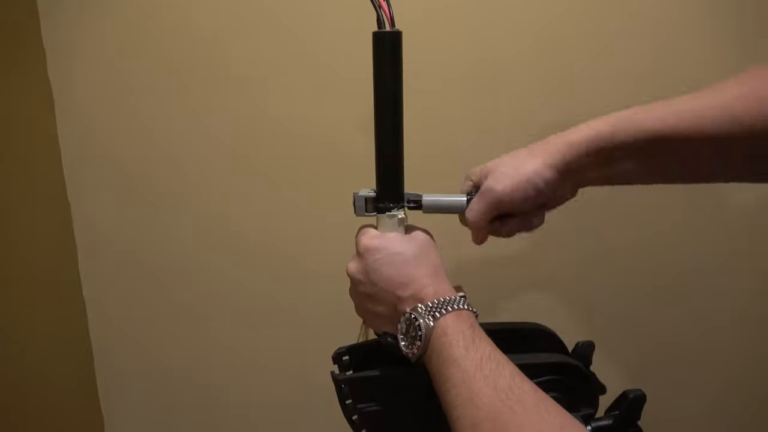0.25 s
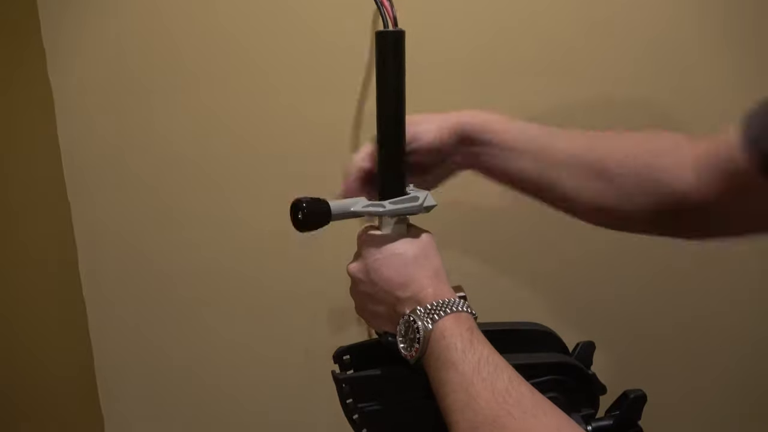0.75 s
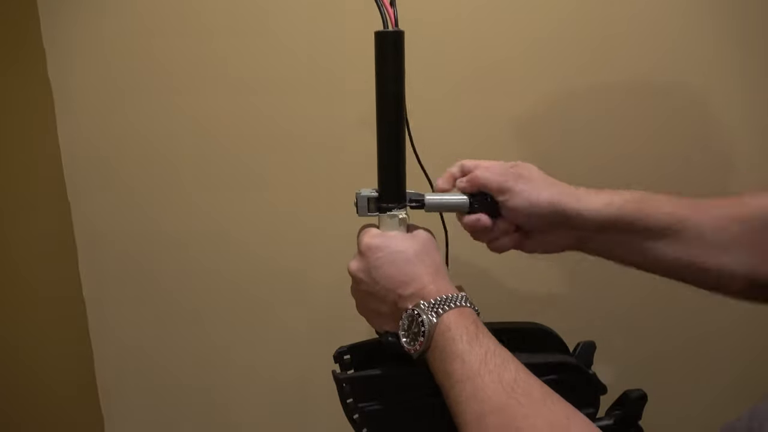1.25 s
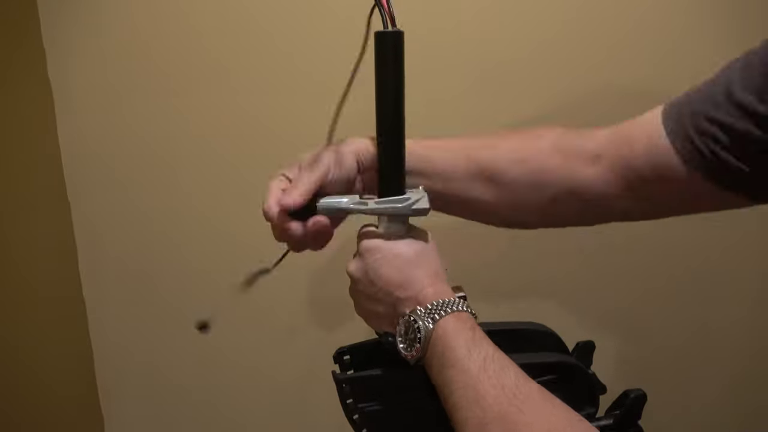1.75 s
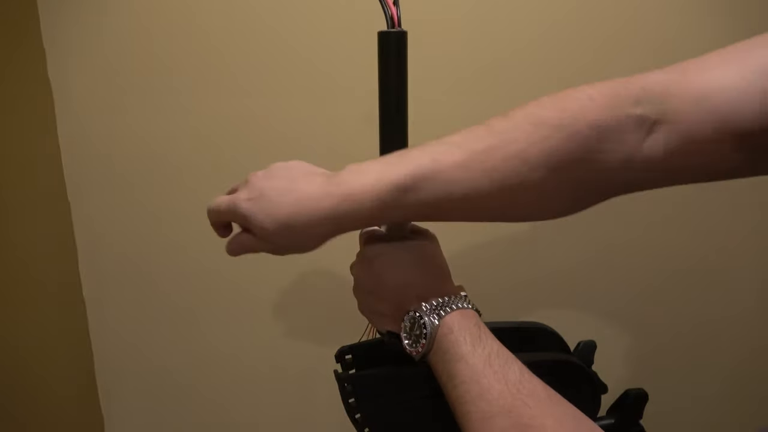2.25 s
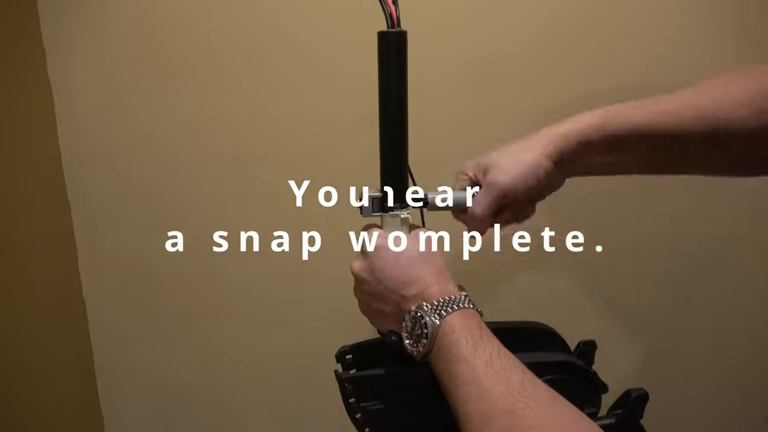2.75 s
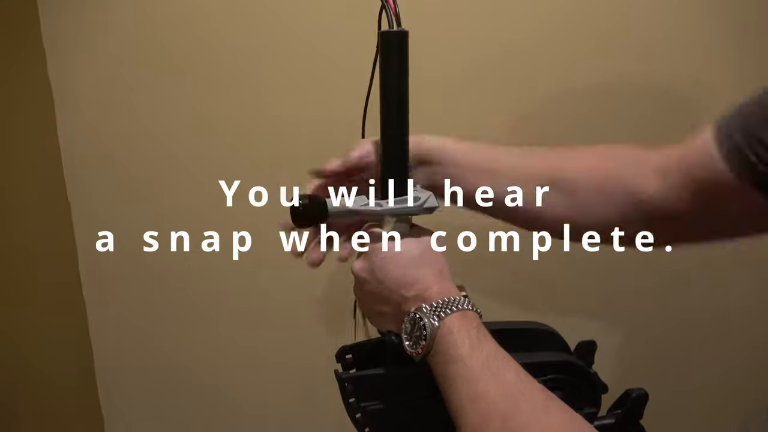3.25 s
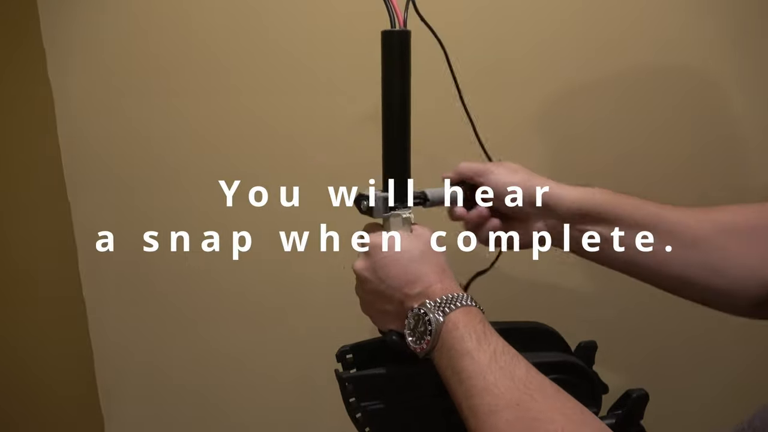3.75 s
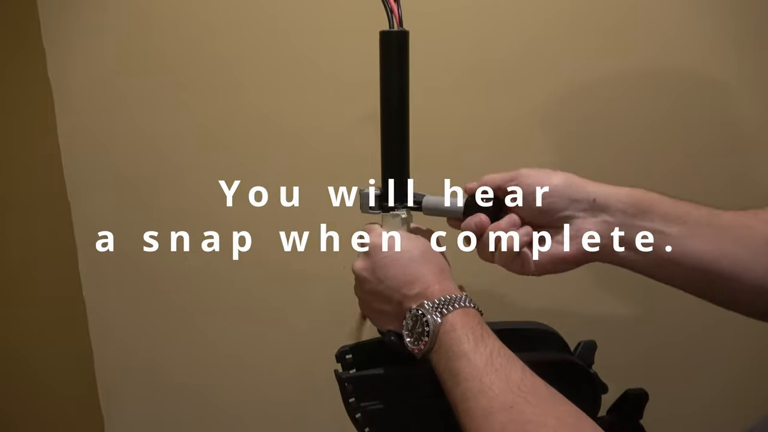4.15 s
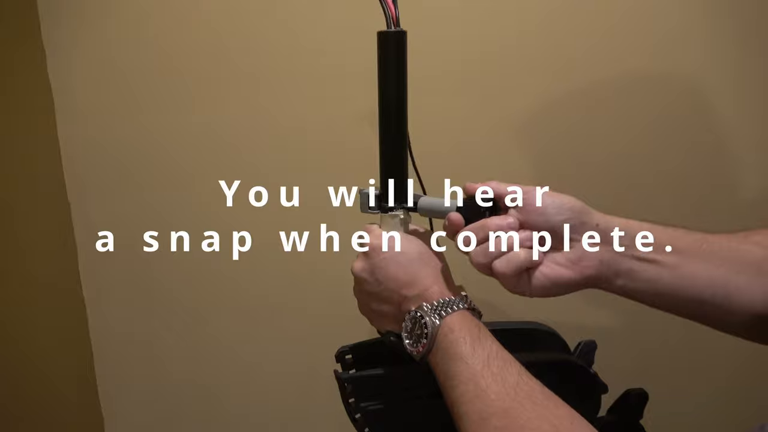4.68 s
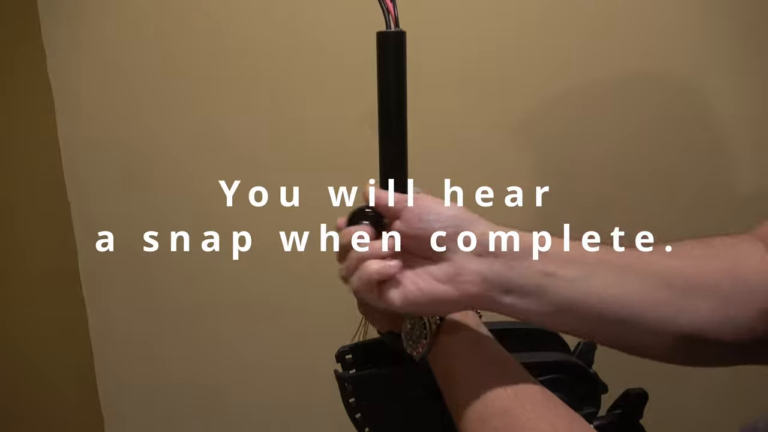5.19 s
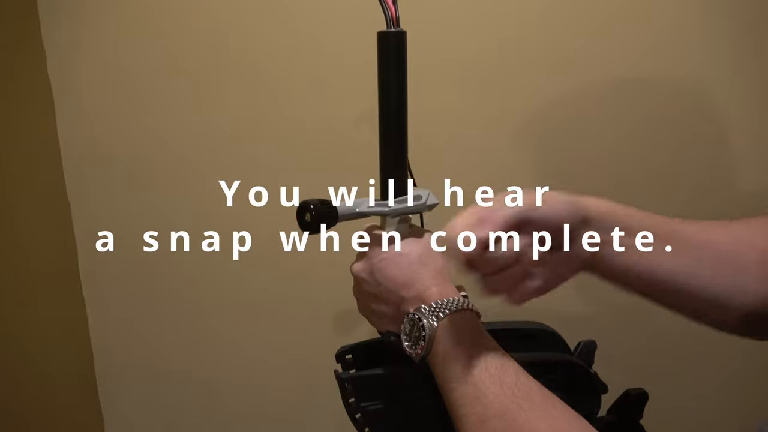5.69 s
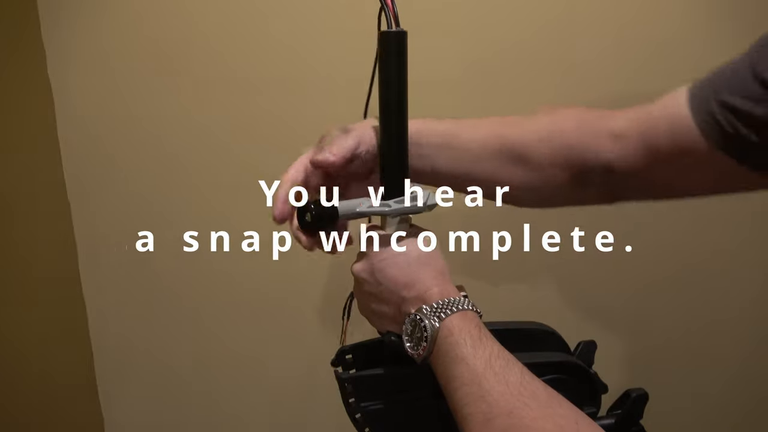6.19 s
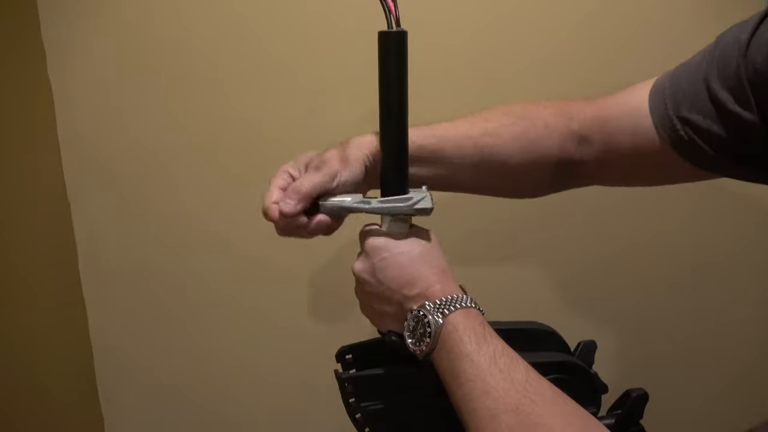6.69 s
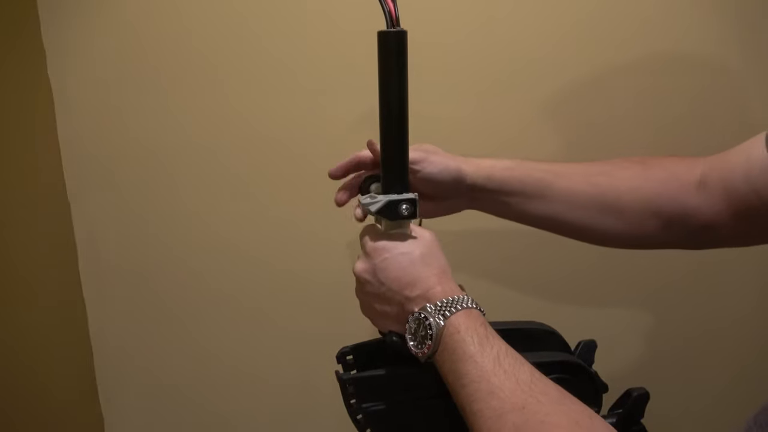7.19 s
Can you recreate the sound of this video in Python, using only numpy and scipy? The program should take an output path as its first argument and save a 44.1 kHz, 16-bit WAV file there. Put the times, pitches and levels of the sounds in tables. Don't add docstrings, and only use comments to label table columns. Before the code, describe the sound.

A phone sits close to a pipe cutter turning on a metal tube in a bare room. From 0 to 3.5 s the turns are sped up: gritty metal rubbing surges and pauses, with soft-edged, blurred knocks and rattles in a short, wide, unnatural echo. It starts quiet, grows busier after 1.1 s, and peaks with heavy clunks and low stand thumps at about 1.9, 2.2 and 2.6 s, then eases. From 3.5 s speed is natural: crisp clicks and hard, bright ringing clacks cluster at 3.6-3.95 s. Quieter rubbing and faint hiss follow, with a sharp tick at 4.8, small clicks around 5.05-5.4, and soft hollow thunks at 5.6 and 6.2. A rough singing rub rises from 6.6 s into a piercing snap at 6.77, by far the loudest event. Bright metallic chatter rings, dulls and fades, with a small settling rattle at 7.33.

```python
import sys
import numpy as np
from scipy import signal
from scipy.fft import rfft, irfft, next_fast_len
from scipy.io import wavfile
from scipy.ndimage import uniform_filter1d

SR = 44100
rng = np.random.default_rng(int(sys.argv[2]) if len(sys.argv) > 2 else 0)


def pcm_store(signal):
    levels = np.round(np.clip(np.atleast_2d(signal), -1, 1) * 32767)
    wavfile.write(sys.argv[1], SR, levels.astype(np.int16).T)


def magnitude_from_level(level_db):
    exponent = np.asarray(level_db, float) / 20
    return 10 ** exponent


N = 327652
NATURAL_S = 3.46
STAND_LIKE = 0.1
THUMP_RISE_MS = 6

# pitch in Hz, level in dB, ring time (t60) in s.
TUBE_MODES = [(694, 7.5, 0.065), (910, -57.5, 0.034), (1130, -5.5, 0.2), (1575, -4.5, 0.12),
              (1950, 16.5, 0.012), (2290, 13.5, 0.0078), (2500, 15, 0.013)]
TOOL_MODES = [(2676, 4, 0.025), (3260, 15, 0.0079), (3800, 14.5, 0.0063), (4080, -4.5, .05),
              (4400, -5, 0.055), (4670, 6, 0.0075), (4860, -13, 0.032)]
WHEEL_MODES = [(6810, -10, 0.008), (7570, -23, 0.0085), (8000, -10, 0.0042), (9210, 6, 0.0017),
               (13200, -25, 0.0045)]
# lowest Hz, highest Hz, share of broad click in dB, length of push in ms,
# blow level in dB, left-right likeness of the rubbing (0-1).
PART_SETTINGS = [
    (1042, 3200, 4, 1, 9, 0.73),
    (2500, 5330, 2, 0.81, 9, 0.73),
    (5240, 14260, 6, 0.45, 9, 0.7),
]
# start in seconds, peak in dB,
# pitch in Hz.
THUMPS = [(0.038, -74, 225), (0.537, -47.5, 136), (0.09, -63, 150), (1.354, -53, 215),
          (1.511, -40, 215), (1.88, -46.5, 145), (2.029, -47.5, 160.4), (2.175, -25, 519),
          (2.185, -29, 161), (2.238, -33.5, 536), (2.25, -37, 166), (2.577, -50, 160),
          (3.49, -51, 146), (3.717, -49, 161), (3.779, -48, 215), (3.894, -46.5, 162),
          (3.943, -48, 165), (4.823, -54.5, 295), (5.065, -48.5, 496), (5.26, -41.5, 330),
          (6.768, -67, 556), (6.842, -53, 146), (7.111, -49, 151), (7.247, -54, 110),
          (0.19, -48.5, 673), (0.265, -57.5, 497), (1.52, -50, 538), (5.578, -45.5, 633),
          (6.227, -49, 613), (5.1, -58, 169), (3.9, -37.5, 669), (3.948, -38, 702), (6.77, -32.5, 693),
          (3.64, -51, 690)]
# time in seconds, effort in dB, brightness in dB.
TUBE_SHUDDER = [
    (6.766, -80, -5.5),
    (6.771, -34, -2),
    (6.79, -31, 3.5),
    (6.89, -36, 2),
    (6.95, -40, -9),
    (7.01, -45, -16),
    (7.084, -51, -24),
    (7.3, -58, 4.5),
    (7.43, -68.5, 18),
]


def unit(x):
    return x / np.sqrt(np.mean(x ** 2) + 1e-30)


def band(x, lo_hz, hi_hz):
    sos = signal.butter(3, [lo_hz, min(hi_hz, 20000)], "band", fs=SR, output="sos")
    return signal.sosfilt(sos, x)


def pair(size, like):
    mid, side = rng.standard_normal((2, size))
    like = np.clip(like, 0, 1)
    return np.sqrt(1 + like) * mid + np.sqrt(1 - like) * side * np.array([[1], [-1]])


def through(x, response):
    return signal.fftconvolve(x, np.atleast_2d(response), axes=1)[:, :N]


def coloured(x, hz, db):
    size = next_fast_len(N)
    log_hz = np.log(np.fft.rfftfreq(size, 1 / SR) + 1)
    gain = magnitude_from_level(np.interp(log_hz, np.log(hz), db))
    return irfft(rfft(x, size) * gain, size)[..., :N]


def body(modes, lo_hz, hi_hz, broad_db, hurry):
    t = np.arange(SR // 4) / SR
    ring = sum(magnitude_from_level(db) * np.sin(2 * np.pi * hz * t) * 1000 ** (-t * hurry / t60) for hz, db, t60 in modes)
    click = band(1. * (t == 0), lo_hz, hi_hz)
    both = band(unit(ring), lo_hz * 0.9, hi_hz * 1.14) + magnitude_from_level(broad_db) * unit(click)
    return unit(both) / np.sqrt(len(t))


def tones(s, db, hz, rise_ms, t60, like, spread):
    t = np.arange(int(SR * min(t60 + .01, .3))) / SR
    swell = (1 - np.exp(-(t * 1000 / rise_ms) ** 2)) * 1000 ** (-t / t60)
    out = np.zeros((2, N + 2 * len(t)))
    chances = rng.random((len(s), 5, 4, 1))
    for at, gain, f, chance in zip((s * SR).astype(int), magnitude_from_level(db), hz, chances):
        for rank, (detune, start, *sides) in enumerate(chance):
            pitch = f * (1 + spread * min(rank, 1) * (2 * detune - 1))
            phase = 2 * np.pi * (pitch * t + start + (1 - like) * np.array(sides))
            out[:, at:at + len(t)] += gain * 0.54 ** rank * swell * np.sin(phase)
    return out[:, :N]


def pushes(table, column, shape, like, kick):
    out = np.zeros((2, N + 2 * len(shape)))
    for row in table:
        at = int(row[0] * SR)
        gain = magnitude_from_level(row[1] + row[column])
        out[:, at:at + len(shape)] += gain * (kick + shape * pair(len(shape), like))
    return out[:, :N]


def effort(answer):
    # start of most effort in seconds, effort in dB, brightness in dB, rise in s, fall in s.
    fast_strokes = [(0.0, -48, -7, .1, 0.25), (0.2, -54, -9, 0.083, 0.06), (0.336, -54.5, 9.5, 0.12, -0.3),
                    (0.48, -58, 0, 0.023, 0.13), (0.562, -55, -14, 0.12, 0.1),
                    (0.67, -57, -0.5, 0.54, -0.67), (0.97, -52, -3, 0.052, -0.06),
                    (1.1, -45.5, -8, 0.13, -0.02), (1.2, -49.5, -10, 0.087, 0.05),
                    (2.535, -47, -12, .04, .1), (2.62, -49, -17, 0.071, 0.06),
                    (2.82, -50.5, -4, 0.035, .05), (2.33, -48, -13, .03, 0.05), (1.52, -47, -15, 0.077, 0),
                    (1.609, -52, -1.5, 0.74, 0.12), (1.958, -43.5, -9.5, 0.2, 0.08),
                    (2.14, -52.5, -4, 0.42, -10), (2.209, -36.5, -8.5, 0.086, 0.1347),
                    (2.35, -63.5, 8.5, 0.17, 0.4), (2.629, -50, 1.5, 0.26, 0.11),
                    (2.88, -54.5, -15, 0.13, 0.37), (3.141, -54, -1, 0.8, 0.17), (3.22, -73, 7, 0.25, 4)]
    natural_strokes = [(3.51, -51, 4, 0.13, 0.055), (3.65, -44, -15, 0.23, 0.31), (3.8, -74, -3, .3, .2),
                       (3.89, -44.5, 1, 0.044, 0.19), (3.98, -54, -6, 0.36, 0.042),
                       (4.211, -56, -0.5, 0.16, 0.38), (4.45, -65.5, 17, 0.33, 0.21),
                       (4.81, -63, 6, 0.42, 0.21), (5.02, -54, -24, 0.35, 0.27),
                       (5.2, -57, 0.5, 0.32, 0.44), (5.32, -54.5, -3, 0.63, 0.34),
                       (5.6, -57.5, -0.5, 0.97, 0.37), (5.83, -63.5, 1, 0.86, 0.11),
                       (6.118, -74, 30, .015, 0.13), (6.165, -82, 24, 0.1, 0.043),
                       (6.22, -65, 3, 0.1, 0.016), (6.24, -53.5, -14, .015, 0.22),
                       (6.287, -67, 10, 0.089, 0.17), (6.614, -68.5, 14.5, 0.068, 0.22),
                       (6.676, -56.5, 5.5, 0.094, 0.32), (6.752, -57, 3.5, 0.088, 0.014),
                       (6.775, -45, 17, .008, .15), (7.115, -44, -13, .04, 0.096)]
    # dB at usual effort, dB per dB of effort, dB per dB of brightness, dB at rest.
    answers = [
        (-71, 0.7552, 0.28, -97),
        (-55.5, 1, 0, -96),
        (-57.5, 1.2, 0.7447, -92),
        (-55.5, 1, 1, -69),
    ]
    usual_effort_db = -55
    stroke_db = 20
    t = np.arange(0, N + 128, 128) / SR
    usual_db, slope, tilt, rest_db = answers[answer]
    s, db, bright, rise, fall = np.transpose([*fast_strokes, *natural_strokes])[:, :, None]
    before, after = (s - t) / np.maximum(rise, 1e-3), (t - s) / np.maximum(fall, 1e-3)
    db = db - stroke_db * np.where(t < s, before, after)
    strokes = magnitude_from_level(slope * (db - usual_effort_db) + tilt * bright)
    at, shake_db, shake_bright = np.transpose(TUBE_SHUDDER)
    shake = slope * (np.interp(t, at, shake_db, left=-150) - usual_effort_db)
    shake = shake + tilt * np.interp(t, at, shake_bright)
    power = np.sum(strokes ** 2, axis=0) + magnitude_from_level(shake) ** 2
    gain = np.sqrt(magnitude_from_level(usual_db) ** 2 * power + magnitude_from_level(rest_db) ** 2)
    return np.interp(np.arange(N) / SR, t, gain)


def friction(answer, grit_db, like):
    t = np.arange(N) / SR
    grains = magnitude_from_level(grit_db * np.minimum(rng.exponential(size=N), 7))
    return effort(answer) * unit(pair(N, like * (t > NATURAL_S)) * grains)


def room(hurry, echo_db, tied):
    # pitch in Hz, echo time (t60) in s, echo level in dB, left-right likeness (0-1).
    echo_bands = [(150, 1.1, 6.5, 0.9), (500, 0.35, 6.5, 0.87), (1545, 0.48, -1, 1), (4300, 0.56, -4.5, 1),
                  (7460, 0.45, -3.5, 0.5), (13000, 0.36, -4.5, 0.7)]
    near_db, near_ms, gap_ms, direct = -20.5, 7.65, 0.66, 0.65
    t = np.arange(int(1.3 * SR / hurry)) / SR
    hz, *columns = np.transpose(echo_bands)
    tail = magnitude_from_level(near_db) * pair(len(t), 1.0 * tied) * np.exp(-t * 1000 / near_ms)
    for centre in 110 * 2 ** np.arange(0, 7.5, .5):
        t60, db, like = (np.interp(np.log(centre), np.log(hz), c) for c in columns)
        noise = band(pair(len(t), like * tied), centre * 2 ** -.25, centre * 2 ** 0.27)
        tail = tail + magnitude_from_level(db + echo_db - 30) * noise * 1000 ** (-t * hurry / t60)
    return tail * np.clip(t * 1000 / gap_ms, 0, 1) + direct * (t == 0)


def ports(x):
    # pitch in Hz, gain on the left-right difference in dB.
    width = [(150, -13), (900, -6.5), (1400, -8.5), (4200, -5), (5200, -0.5), (13000, 1.5)]
    side = (x[0] - x[1]) / 2
    natural_speed = np.clip((np.arange(N) / SR - NATURAL_S) * 20, 0, 1)
    change = (coloured(side, *np.transpose(width)) - side) * natural_speed
    return x + change * np.array([[1], [-1]])


def air():
    # pitch in Hz, level in dB per Hz.
    hiss_colour = [(24, -66), (40, -44), (110, -25), (228, -3), (258, -6.5), (293, -4), (1400, -23),
                   (3550, -7), (4340, -8.5), (10500, -12), (15300, -16.5), (16500, -33)]
    hiss = magnitude_from_level(-65.5) * unit(coloured(pair(N, 0.16), *np.transpose(hiss_colour)))
    ducking = np.minimum(effort(3) / magnitude_from_level(-58.5), 1) ** 0.3
    return ducking * hiss


def pauses():
    # middle in seconds, depth in dB, half length in s.
    let_go = [
        (0.427, -8, 0.045),
        (0.888, -2.5, 0.03),
        (1.32, -4.5, .02),
        (1.84, -7, 0.024),
        (2.484, -8.5, 0.031),
        (2.755, -3.5, 0.043),
        (3.386, -6.5, 0.042),
    ]
    s, db, half = np.transpose(let_go)[:, :, None]
    t = np.arange(0, N + 128, 128) / SR
    dips = magnitude_from_level(np.sum(db * np.exp(-((t - s) / half) ** 4), axis=0))
    return np.interp(np.arange(N) / SR, t, dips)


def stand():
    # pitch in Hz, level in dB, ring time (t60) in s.
    stand_modes = [(158.7, -1, 0.27), (215, -3.5, 0.21), (316, -3.5, 0.092), (375, -8.5, 0.81)]
    rumble = through(friction(0, 1.4, STAND_LIKE), body(stand_modes, 139.5, 355, 1.5, 0.92))
    s, db, hz = np.transpose(THUMPS)
    low, high = hz < 400, hz >= 400
    deep = tones(s[low], db[low] - 4.5, hz[low], THUMP_RISE_MS, 0.18, STAND_LIKE, 0.218)
    bright = tones(s[high], db[high] - 1.0, hz[high], THUMP_RISE_MS, 0.12, STAND_LIKE, 0.23)
    return deep + rumble + bright


def jolts():
    ms = np.arange(SR // 8) * 1000 / SR
    shape = (1 - np.exp(-ms / THUMP_RISE_MS)) * np.exp(-ms / 12.7)
    rows = [(s, db, 4.5) for s, db, _ in THUMPS]
    jolt = pushes(rows, column=2, shape=shape, like=STAND_LIKE, kick=0)
    return band(jolt, 130, 590) + magnitude_from_level(-7) * band(jolt, 25, 135)


def patchy(x):
    _, _, z = signal.stft(x, nperseg=512)
    field = uniform_filter1d(rng.standard_normal(z.shape[1:]), size=5, axis=0)
    field = uniform_filter1d(field, size=6, axis=1)
    return signal.istft(z * magnitude_from_level(3 * unit(field) - 1), nperseg=512)[1][:, :N]


def rubbing():
    rub = 0
    for k, modes in enumerate((TUBE_MODES, TOOL_MODES, WHEEL_MODES)):
        lo_hz, hi_hz, broad_db, _, _, like = PART_SETTINGS[k]
        rub = rub + through(friction(k + 1, 2.66, like), body(modes, lo_hz, hi_hz, broad_db - 6, 3.5))
    return patchy(magnitude_from_level(-3.0) * rub)


def hums():
    # start in seconds, peak in dB, pitch in Hz.
    soft_hums = [(5.577, -36.5, 1130), (5.58, -47, 953), (5.58, -49.5, 660), (6.224, -39.5, 1130),
                 (6.226, -51.5, 640.4), (6.23, -51, 980), (5.056, -54, 1115), (7.335, -53, 1450),
                 (4.83, -48.5, 950), (4.83, -50, 2550), (5.372, -56, 1047), (6.23, -52, 2103)]
    fast_hums = [(1.418, -37.5, 1163), (1.198, -45, 1100), (2.8, -40, 1450), (2.568, -32, 2800),
                 (2.572, -34, 3300), (2.6, -36, 2700), (1.232, -42, 3500), (1.097, -41, 3000),
                 (1.1, -43.5, 4600), (1.515, -39, 210), (2.18, -33, 160), (2.24, -38, 290), (2.1, -50, 150),
                 (2.568, -33, 1900), (2.515, -47, 2600), (2.52, -48, 1600), (2.61, -42, 1600),
                 (1.42, -49, 2300), (3.1, -46, 1400)]
    long_rings = [
        (3.952, -37, 4096),
        (6.775, -35, 5297),
        (6.775, -39, 3830),
    ]
    lines = tones(*np.transpose(soft_hums), 1.5, 0.32, 0.85, 0.0404)
    lines = lines + tones(*np.transpose(fast_hums), 3.6, 0.11, 0, .06)
    lines = lines + tones(*np.transpose(long_rings), 2.5, 0.55, 0.87, 0.0079)
    rough_hz = 90
    grip = np.interp(np.arange(N) * rough_hz / SR, np.arange(2000), rng.standard_normal(2000))
    return lines * (1 + 0.45 * grip)


def patches():
    # start in seconds, peak in dB, pitch in Hz.
    lit_patches = [(0.19, -44, 2420), (0.965, -46, 2930), (1.096, -40, 3600), (1.1, -40, 4800),
                   (1.152, -34, 3100), (1.152, -43, 4400), (1.197, -39, 1240), (1.198, -47, 5000),
                   (1.228, -42, 3500), (1.35, -52, 1528), (1.419, -40, 1174), (1.52, -52, 2180),
                   (1.55, -45, 3340), (1.6, -54, 2800), (1.74, -46, 3720), (1.908, -21, 2145),
                   (1.91, -41, 3270), (2.176, -31, 2500), (2.18, -32, 6700), (2.212, -43, 4600),
                   (2.318, -43, 2100), (2.535, -44, 2500), (2.579, -26, 1950), (2.585, -39, 2880),
                   (2.575, -40, 1570), (2.598, -29, 2260), (2.58, -39, 3470), (2.615, -46, 3000),
                   (2.8, -49, 1470), (2.844, -37, 1520), (2.84, -47, 7700)]
    return tones(*np.transpose(lit_patches), 5, 0.06, 0, 0.149)


def favoured(table, tone_db, rise_ms, t60, like, spread):
    s, peak, knock, ring, hard, hz = np.transpose(table)
    knock = knock - 0.06 * np.minimum(hard, 0) * (s > NATURAL_S)
    part_db = np.where(hz < PART_SETTINGS[1][0], knock, ring - 3)
    return tones(s, peak + part_db + tone_db, hz, rise_ms, t60, like, spread)


def blows(*kinds):
    return [(s, db, 0, ring_db + 0.23 * hard, hard, hz)
            for table, ring_db in kinds for s, db, hard, hz in table]


def hurried_blows():
    # start in seconds, strength in dB, hardness in dB, loudest pitch in Hz.
    fast_knocks = [
        (0.039, -53.5, -8, 1615),
        (0.189, -43, -22, 1436),
        (0.262, -48, -32, 1486),
        (1.418, -42.5, -36, 1170),
        (1.657, -54, -8, 1460),
        (2.314, -43.5, -16, 1333),
        (2.526, -53, -6, 2580),
        (2.989, -55.5, -11, 1284),
    ]
    fast_clicks = [(0.462, -71.5, 11, 2360), (0.49, -64, 5.5, 3150), (0.733, -65, -4, 1840),
                   (0.944, -60.5, 3, 2940), (1.197, -44.5, -3, 1088), (1.344, -55, -0.5, 1450),
                   (1.516, -54, -12, 2120), (1.863, -54, -4.5, 3090), (2.003, -51.5, -8, 3100),
                   (2.022, -54.5, -6, 1130), (2.145, -49, -12, 2610), (2.174, -35, -0.5, 2474),
                   (2.251, -44, -10, 1480), (2.573, -37, -14, 1810), (2.58, -33.5, -20, 2020),
                   (2.186, -42.5, 2.5, 3660), (2.797, -51.5, 2.5, 1404), (2.842, -51.5, 6.5, 1570),
                   (3.224, -61, 3.5, 3430), (3.277, -60.5, 5, 1524), (3.416, -53, -0.5, 1900)]
    fast_rattles = [
        (0.82, -75.5, 14.5, 2560),
        (1.099, -48.5, -8, 2590),
        (1.154, -39.5, -8, 2640),
        (1.226, -42, -18, 3220),
        (1.74, -44, -23, 2860),
        (1.926, -42.5, -20, 2040),
        (1.945, -50, -23, 1590),
        (1.909, -34.5, -13, 2105),
        (2.209, -45, -6, 2800),
    ]
    return blows((fast_knocks, -8), (fast_clicks, 0.5), (fast_rattles, 7))


def natural_blows():
    # start in seconds, strength in dB, hardness in dB, loudest pitch in Hz.
    knocks = [
        (3.477, -51.5, 3, 1010),
        (3.629, -41.5, -27, 1450),
        (3.869, -37, 7, 2400),
        (3.907, -34, -20, 1217),
        (5.057, -56, -16, 1130),
        (5.255, -53.5, 10, 2400),
        (6.732, -44.5, -3, 2900),
    ]
    thunks = [
        (5.577, -37.5, -27, 1550),
        (6.224, -42, -20, 2100),
    ]
    ticks = [
        (4.827, -38.5, 11, 1880),
    ]
    rattles = [
        (6.758, -45, -14, 3900),
        (7.328, -40, -1, 4000),
    ]
    clicks = [(3.489, -49, 13, 4100), (3.506, -42.5, 1.5, 3100), (3.616, -33, -21.5, 1405),
              (3.644, -43, 9, 2300), (3.655, -38, 6, 4300), (3.666, -30, 4.5, 4220),
              (3.721, -34.5, 6.5, 3810), (3.901, -31, 14.5, 2600), (3.942, -31.5, 6, 1476),
              (3.948, -28, 9.5, 4150), (4.663, -63.5, 5, 2300), (4.78, -70.5, 21.5, 3240),
              (4.791, -62, 4, 3530), (5.15, -71.5, 26.5, 1770), (5.215, -56, 4.5, 2600),
              (5.264, -48.5, -4, 3700), (5.358, -59, 12.5, 2500), (5.372, -48, 0, 2600),
              (5.388, -50, 10, 2420), (6.774, -35, 3, 1480), (6.766, -24.5, 10, 3920),
              (7.338, -45.5, -18, 1426)]
    return blows((knocks, -2.5), (thunks, -15), (ticks, 2), (rattles, 5), (clicks, -1.5))


def hurried_strikes():
    ms = np.arange(SR // 16) * 1000 / SR
    blurred = np.exp(-.5 * (ms / 4.16 - 2.5) ** 2)
    table = hurried_blows()
    struck = 0
    for k, modes in enumerate((TUBE_MODES, TOOL_MODES, WHEEL_MODES)):
        lo_hz, hi_hz, broad_db, *_ = PART_SETTINGS[k]
        top_hz = hi_hz * (.8 if k == 2 else 1)
        push = pushes(table, k + 2, blurred, 0, 0)
        struck = struck + through(push, body(modes, lo_hz, top_hz, broad_db - 2.5, 1.5))
    struck = magnitude_from_level(-6.0) * np.roll(struck, -int(0.0092 * SR), axis=1)
    ringing = favoured(table, -0.92, 3.4, 0.066, 0, 0.241)
    return through(struck + ringing, room(3.78, 4, 0))


def sparks():
    # start in seconds, peak in dB, pitch in Hz.
    bright_rings = [(3.645, -40, 9200), (3.656, -37.5, 4100), (3.667, -33, 6060), (3.722, -31, 9560),
                    (3.722, -36.5, 4140), (3.869, -33.5, 9000), (3.902, -24, 8230), (3.902, -27, 9800),
                    (3.943, -35, 6330), (3.949, -32, 6520), (3.951, -25, 7850), (4.828, -51, 6400),
                    (5.577, -42, 1400), (5.587, -51, 2500), (3.619, -45, 2150), (3.667, -34, 4210),
                    (7.329, -42, 5040), (5.582, -47, 1870), (6.767, -22, 6490), (6.767, -18.5, 7480)]
    frame_sings = [
        (3.95, -38, 4080),
        (6.79, -39, 3880),
        (6.79, -37, 5297),
    ]
    short = tones(*np.transpose(bright_rings), 0.34, 0.023, 0.91, 0.098)
    return short + tones(*np.transpose(frame_sings), 2.5, 0.22, 0.9, 0.013)


def cracks():
    # start in seconds, peak in dB.
    first_cracks = [(3.6672, -14.5), (3.7222, -17.5), (3.9022, -14.5), (3.9495, -12), (4.8282, -20),
                    (4.831, -22), (6.7672, -0.5), (6.7689, -6), (6.776, -11), (6.786, -12), (5.157, -40),
                    (5.217, -40), (5.263, -37), (5.392, -36)]
    s, db = np.transpose(first_cracks)
    spikes = np.zeros((2, N))
    spikes[:, (s * SR).astype(int)] = magnitude_from_level(db)
    return band(spikes, 3500, 15400)


def natural_strikes():
    ms = np.arange(SR // 16) * 1000 / SR
    lag_ms, scatter = 1.264, 0.25
    table = natural_blows()
    struck = 0
    for k, modes in enumerate((TUBE_MODES, TOOL_MODES, WHEEL_MODES)):
        lo_hz, hi_hz, broad_db, push_ms, blow_db, _ = PART_SETTINGS[k]
        sharp = (ms > lag_ms) * np.exp(-(ms - lag_ms) / push_ms)
        contact = 3 * (np.arange(len(ms)) == np.argmax(sharp))
        push = pushes(table, k + 2, scatter * sharp, 1, contact)
        struck = struck + through(push, magnitude_from_level(blow_db) * body(modes, lo_hz, hi_hz, broad_db, 0.97))
    ringing = favoured(table, 2, 0.95, 0.032, 1.0, 0.086)
    return through(struck + cracks() + sparks() + ringing, room(0.99, 0.0, 0.88))


def bite():
    # pitch in Hz, level in dB, ring time (t60) in s.
    bite_modes = [(1780, 2.5, 0.011), (2690, 1, 0.014), (3100, 1.6, 0.013)]
    start_s, full_s = 6.62, 6.67
    corners = [start_s, full_s, TUBE_SHUDDER[0][0], TUBE_SHUDDER[1][0]]
    swell_db = np.interp(np.arange(N) / SR, corners, [-25, 0, 0, -90], left=-90)
    return through(magnitude_from_level(swell_db - 51) * unit(pair(N, 0.86)), body(bite_modes, 1170, 3700, -6, 0.93))


def freed():
    # pitch in Hz, level in dB, ring time (t60) in s.
    freed_modes = [(1510, -9, 0.019), (1890, -8, 0.0061), (2710, -25, 0.0084), (3900, -8, 0.015),
                   (4350, -0.5, 0.016), (5410, 6, 0.0067), (6430, 3, 0.0035), (7540, 6, 0.0042),
                   (8400, -4, 0.0057)]
    t = np.arange(N) / SR
    at, db, _ = np.transpose(TUBE_SHUDDER)
    shake = magnitude_from_level(np.interp(t, at, db, left=-150) + 3)
    shake = shake * magnitude_from_level(-22 * np.clip(t - at[3], 0, 1))
    grains = unit(pair(N, .8) * magnitude_from_level(2.4 * np.minimum(rng.exponential(size=N), 6)))
    return through(shake * grains, body(freed_modes, 790, 8200, -3.5, 1))


def scene():
    background = pauses() * (rubbing() + air()) + stand() + jolts()
    turns = hurried_strikes() + patches() + natural_strikes() + hums()
    return ports(background + turns + bite() + freed())


def roll_off(x):
    return signal.sosfilt(signal.butter(12, 16810, fs=SR, output="sos"), x)


def record(dry):
    ceiling = 0.8
    rounded = ceiling * np.tanh(dry / ceiling)
    bass_cut = signal.butter(2, 102, "high", fs=SR, output="sos")
    treble_cut = signal.ellip(4, .5, 22, 15750, fs=SR, output="sos")
    mix = signal.sosfilt(np.vstack([bass_cut, treble_cut]), rounded)
    return roll_off(mix)


dry = scene()
out = record(dry)
pcm_store(out)
```